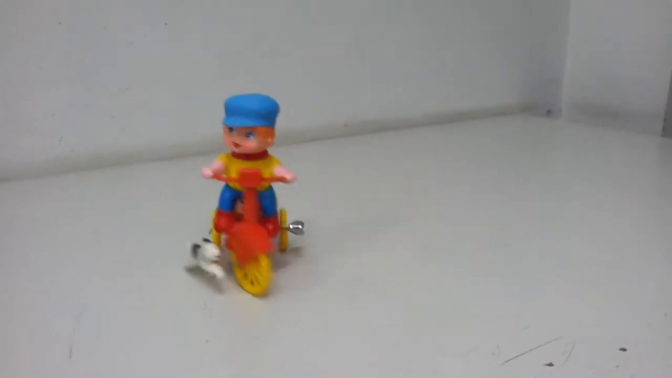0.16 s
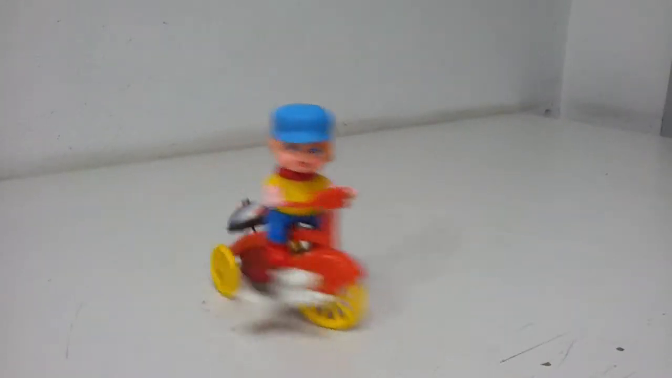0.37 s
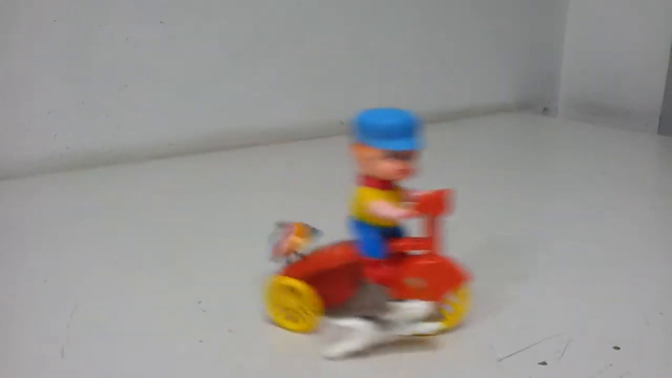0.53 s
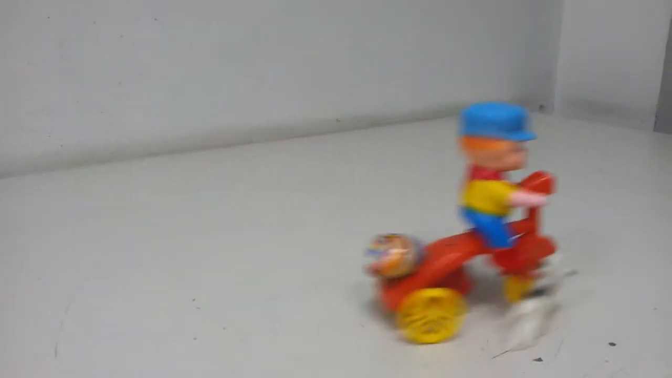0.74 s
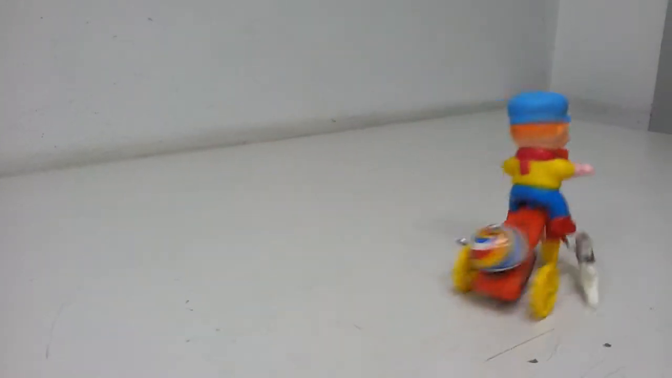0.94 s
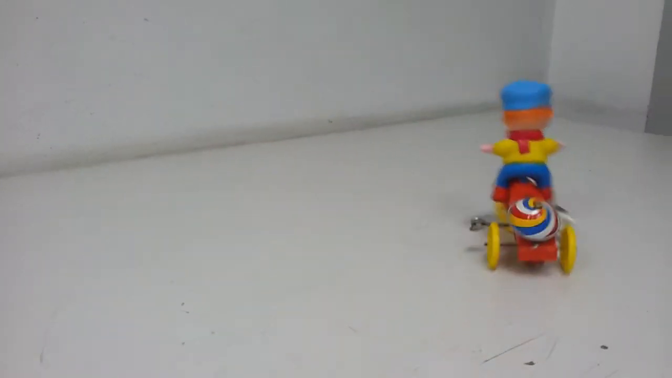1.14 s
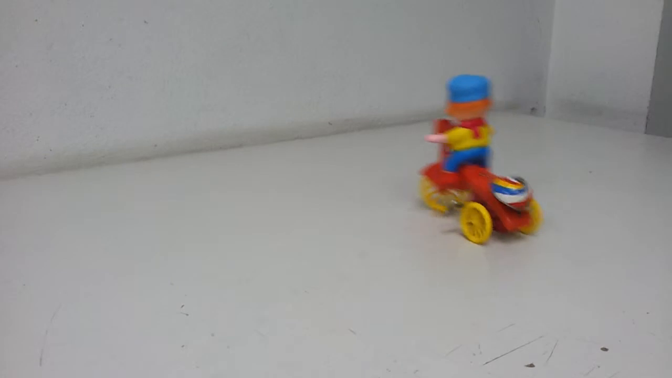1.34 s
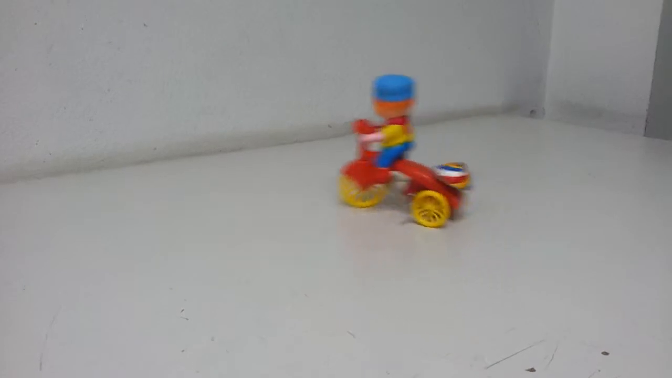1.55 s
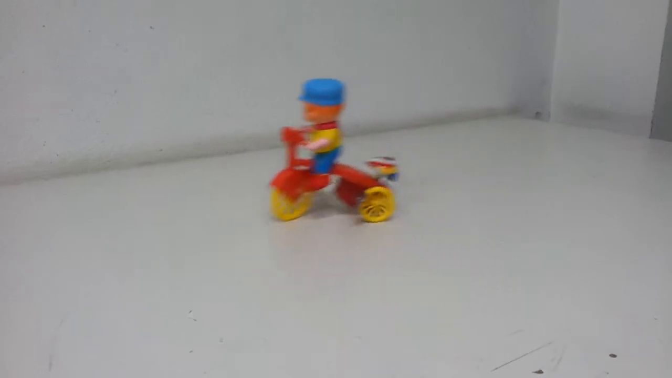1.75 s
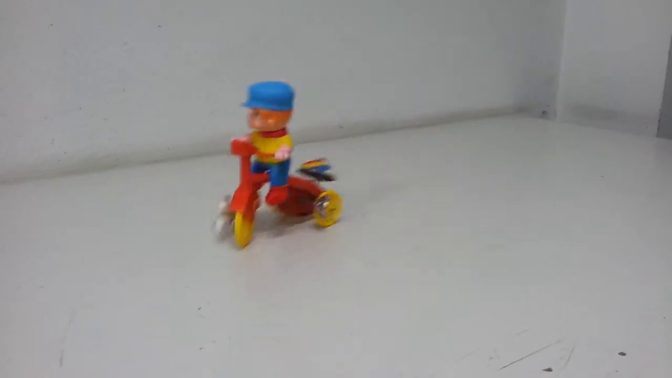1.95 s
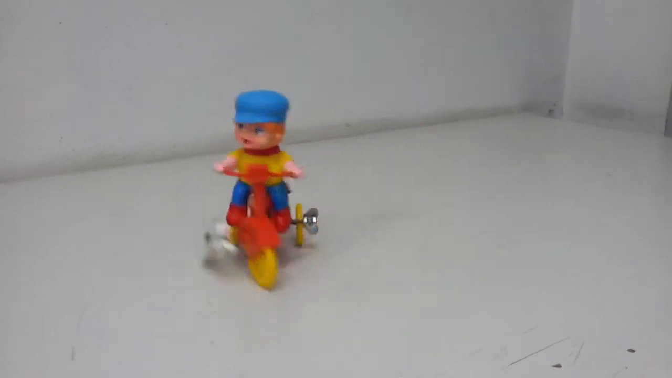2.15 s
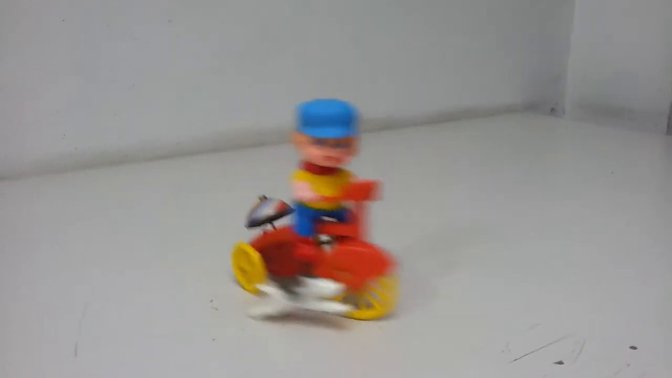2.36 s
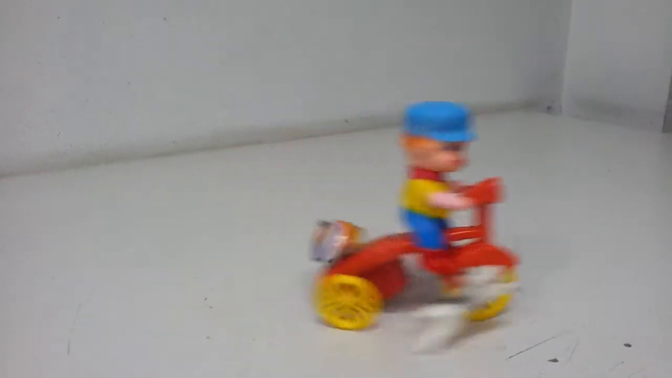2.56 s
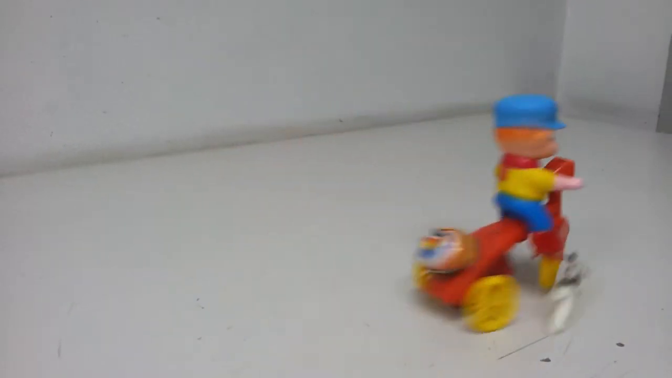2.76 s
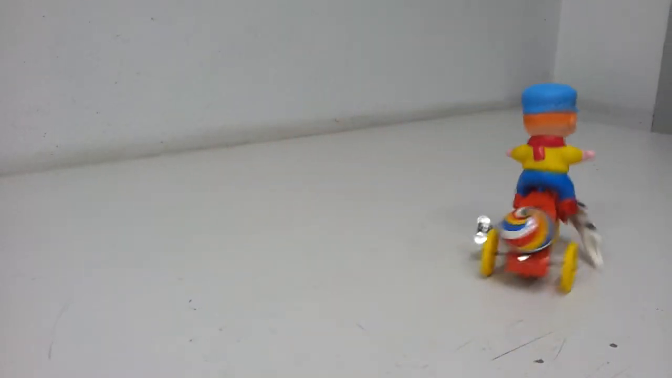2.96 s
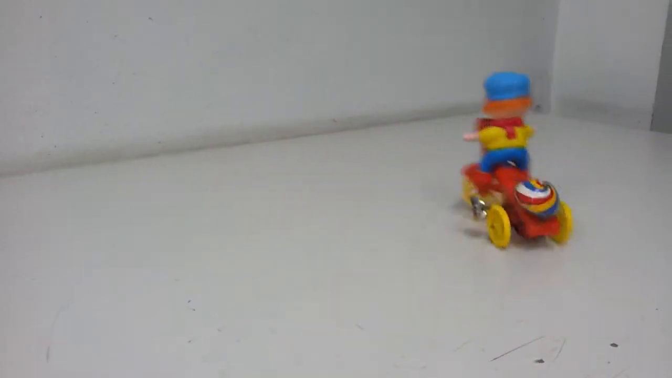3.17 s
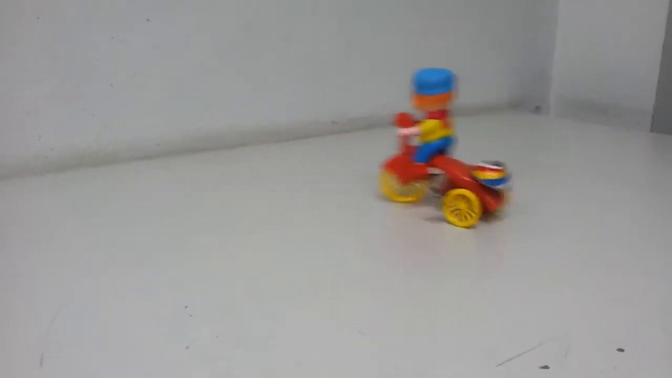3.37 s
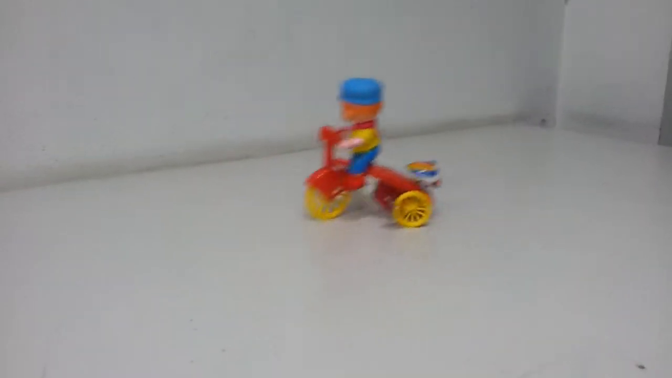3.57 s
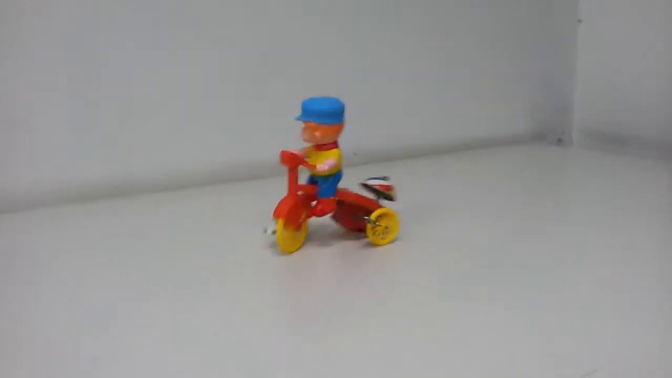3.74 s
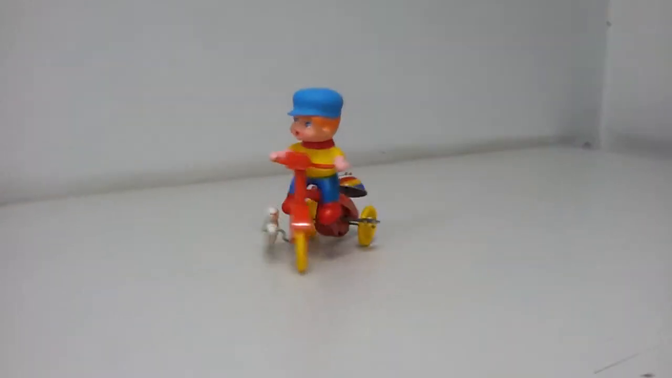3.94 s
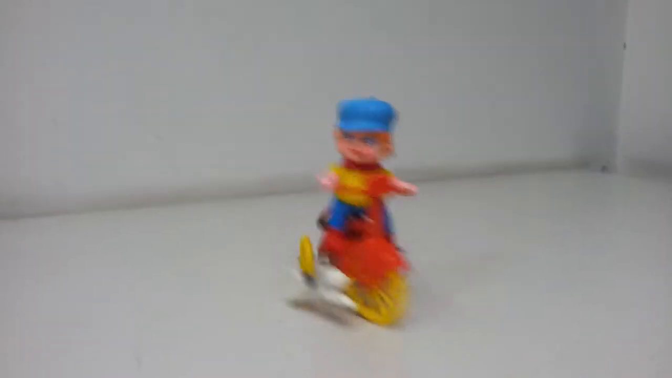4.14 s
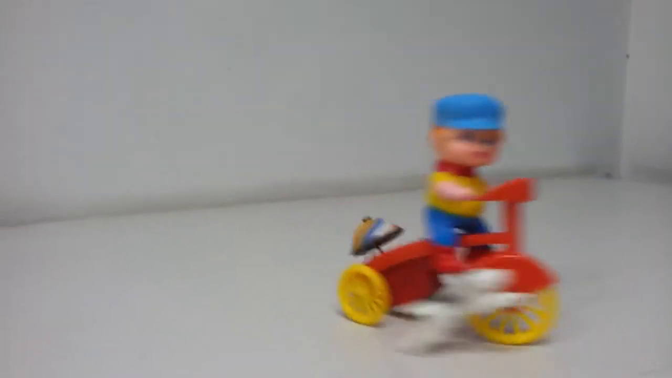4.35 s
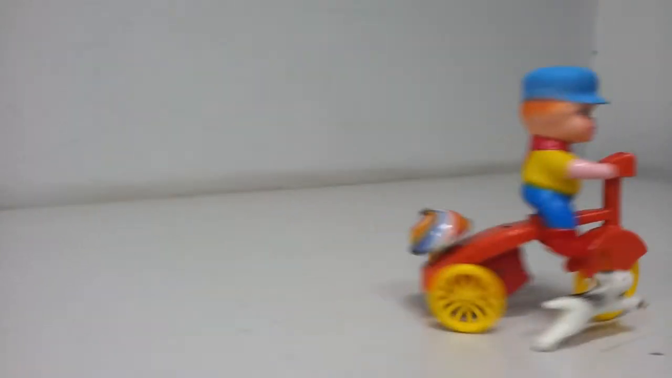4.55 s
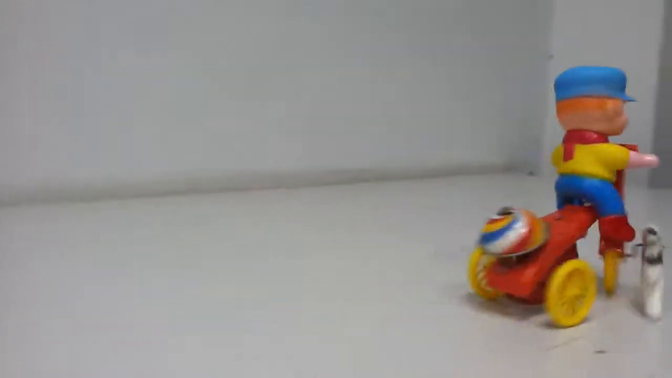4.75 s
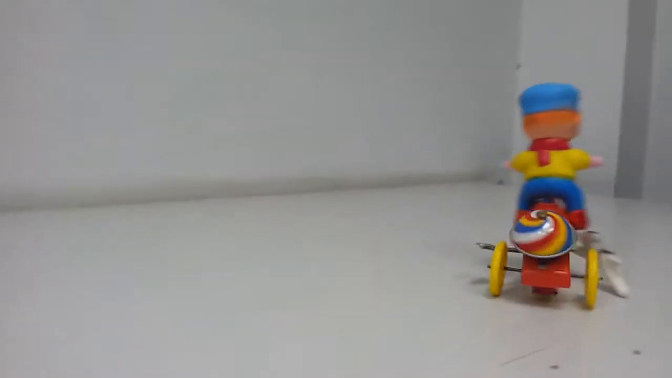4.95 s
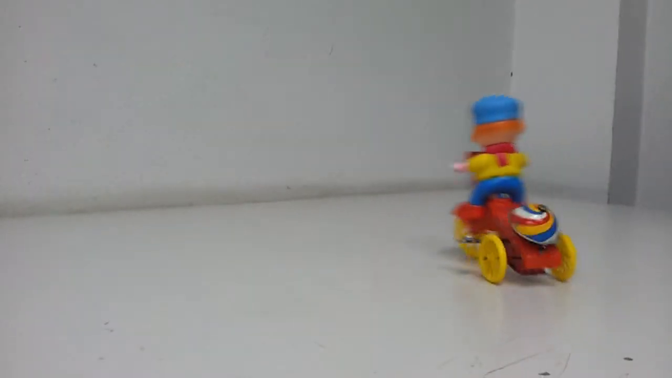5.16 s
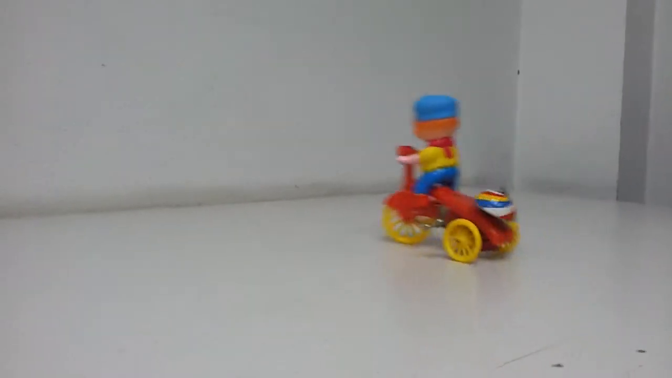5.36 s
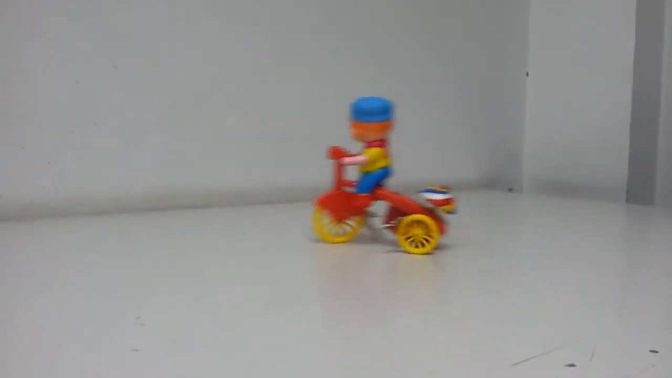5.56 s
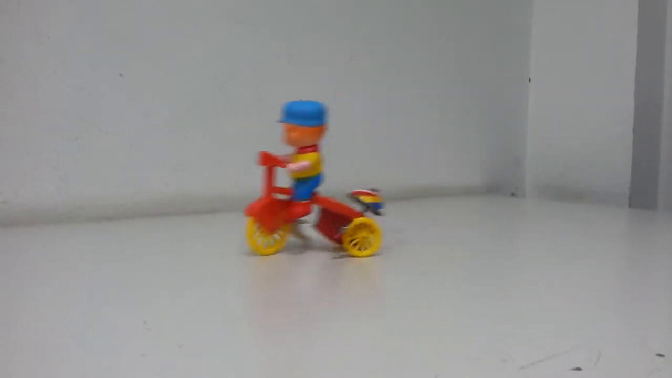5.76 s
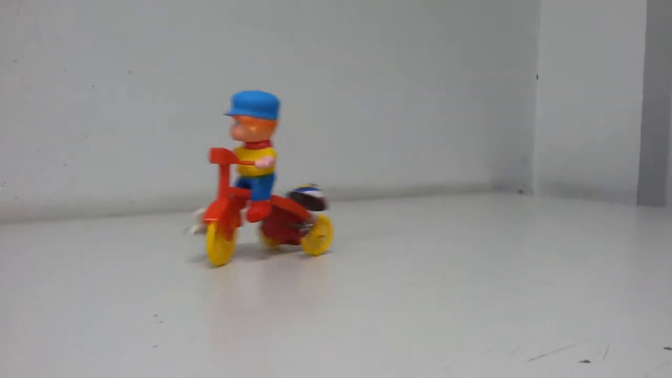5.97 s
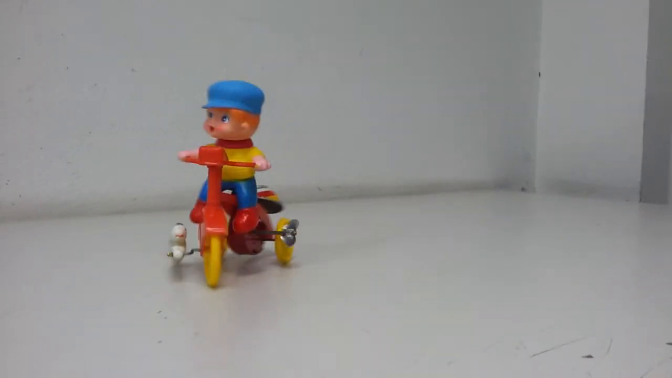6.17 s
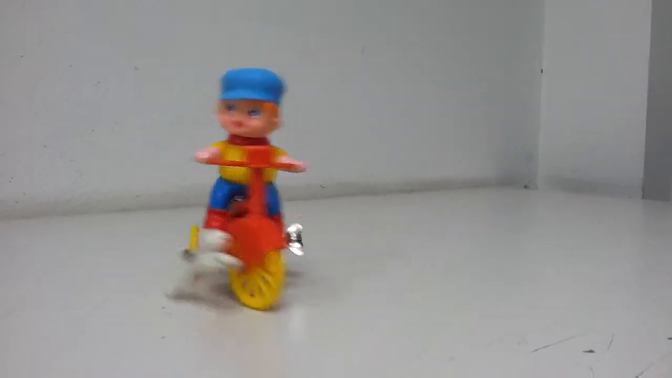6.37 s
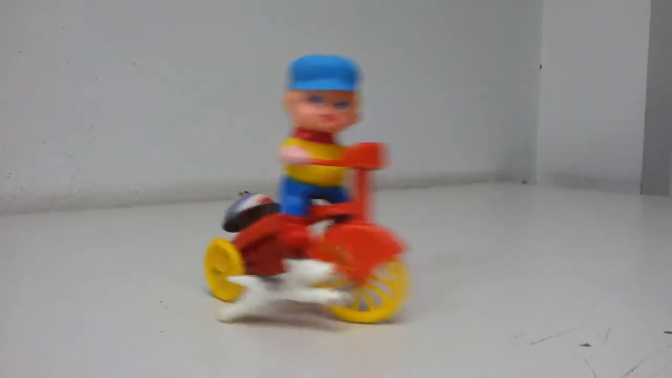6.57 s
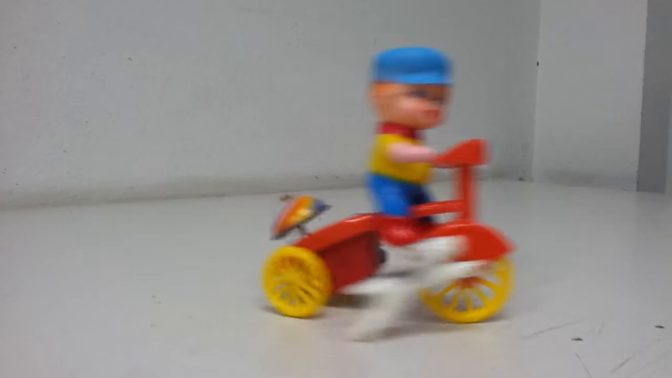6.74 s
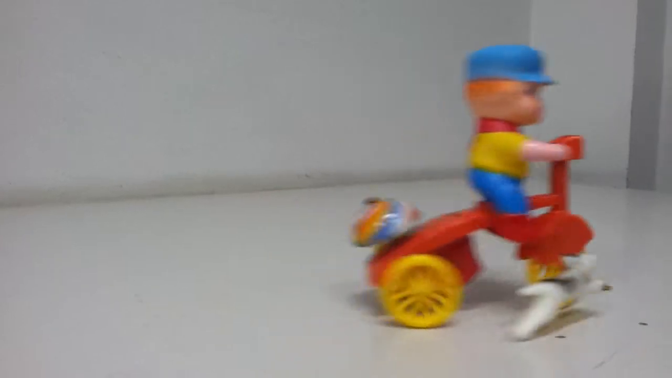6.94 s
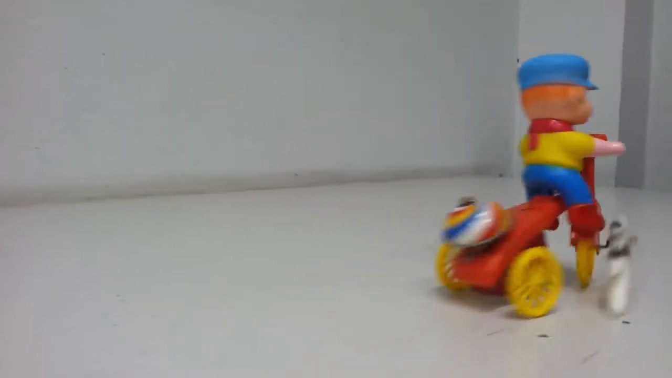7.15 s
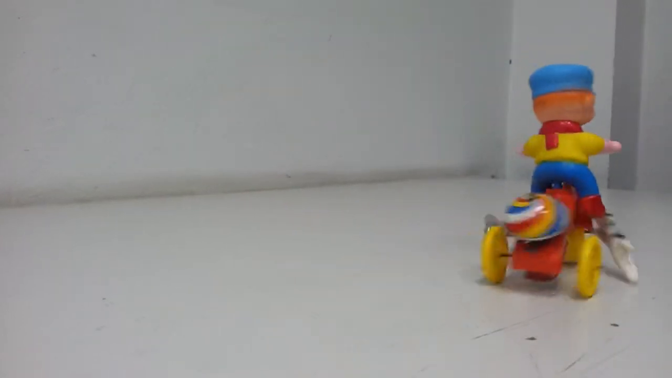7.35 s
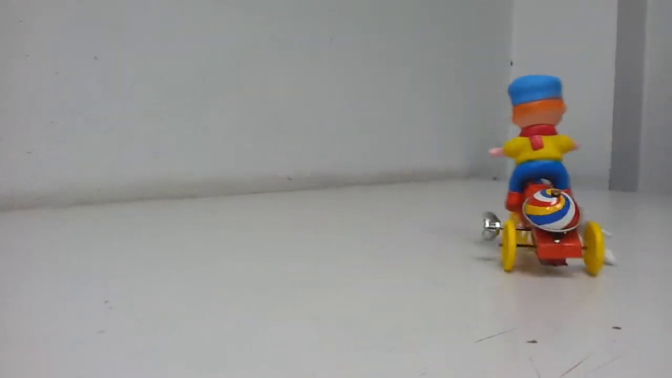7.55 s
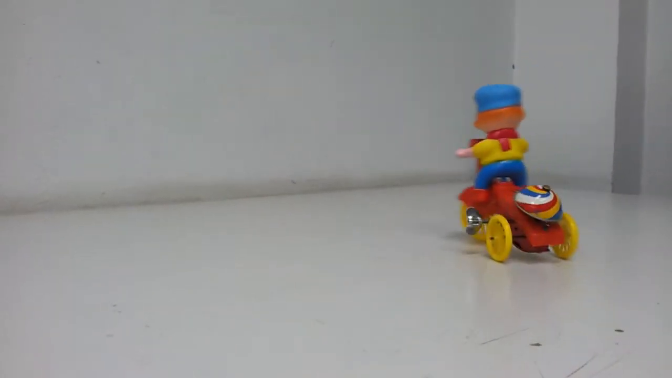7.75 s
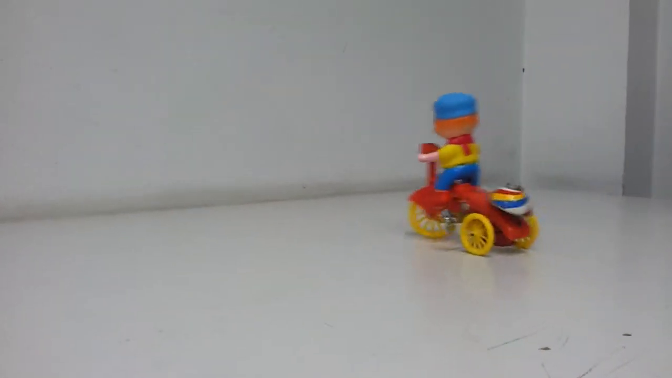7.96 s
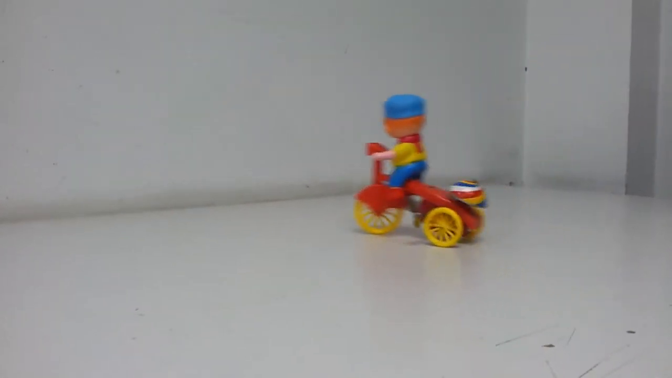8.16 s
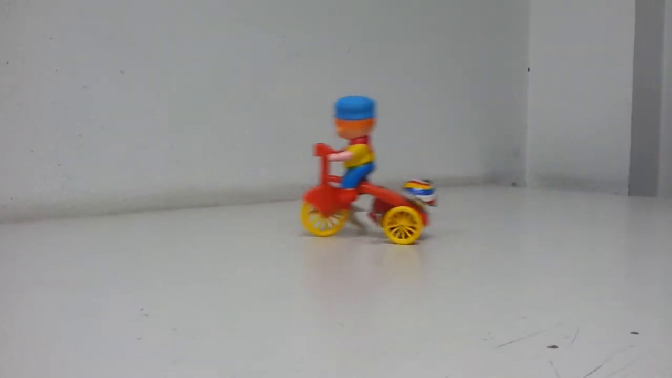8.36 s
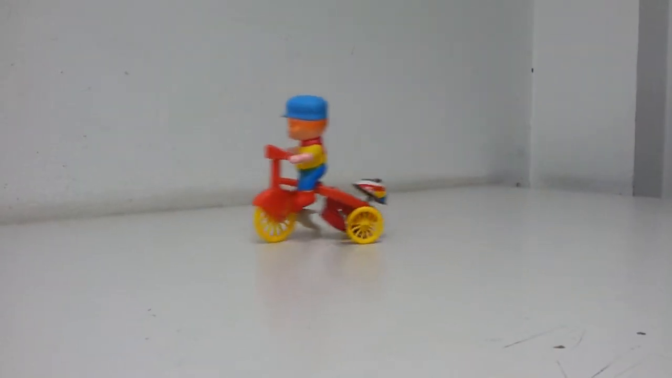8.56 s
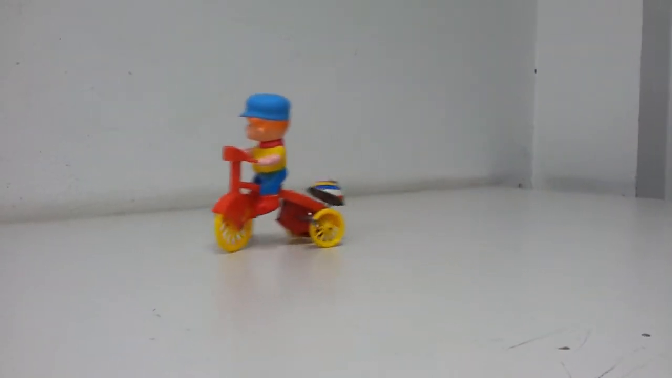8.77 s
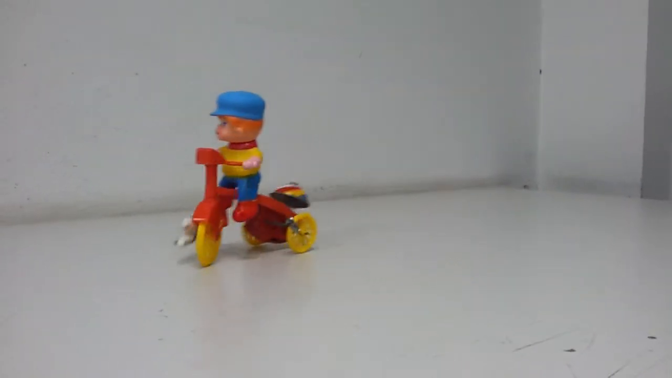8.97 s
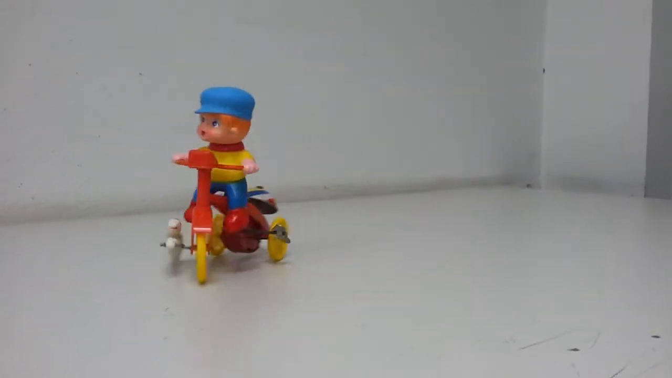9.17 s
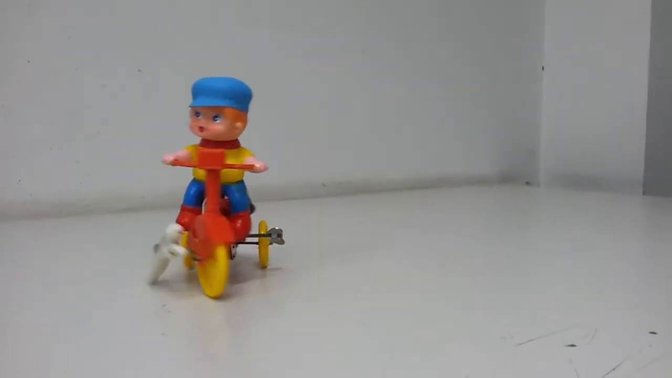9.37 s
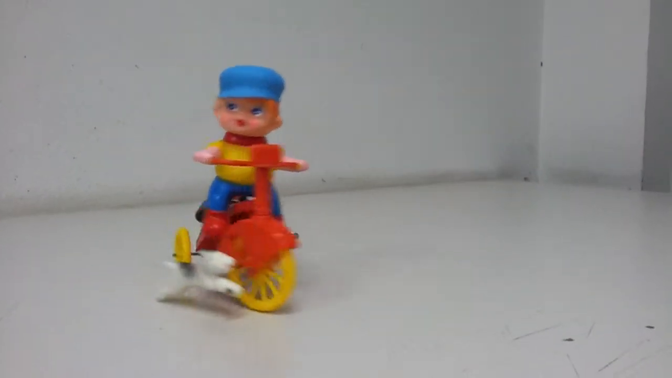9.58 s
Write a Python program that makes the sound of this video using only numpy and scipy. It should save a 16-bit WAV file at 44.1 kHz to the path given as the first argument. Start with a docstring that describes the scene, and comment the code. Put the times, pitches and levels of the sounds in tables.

```python
"""Fast tinny ticking, slowing from about 35 to 20 ticks a second, with bursts of a tiny bell over it.
A clockwork tin tricycle circles on a tabletop in the corner of a small room as its spring runs down.
The escapement shakes the loose tin body (noise bursts in bands); the gears whirr between ticks.
A cam lets the clapper rattle on the bell (split sine pairs). Wheels drone (resonant noise), a few short
low noise bursts break in, and a machine hums (sines) over low room rumble (shaped noise)."""
import sys
import numpy as np
from scipy import signal
from scipy.fft import rfft, irfft
from scipy.io import wavfile
from scipy.ndimage import uniform_filter1d, minimum_filter1d, map_coordinates

SR = 44100
rng = np.random.default_rng(int(sys.argv[2]) if len(sys.argv) > 2 else 0)


def wav_out(sig):
    """Save sig, one row per channel (or a flat mono array), as 16-bit PCM at SR to the path in sys.argv[1]."""
    wavfile.write(sys.argv[1], SR, np.round(np.clip(np.atleast_2d(sig).T, -1, 1) * 32767).astype(np.int16))


N = 423795
TIME = np.arange(N) / SR

# escapement pace as the spring runs down: (time [s], pace [ticks/s])
PACE_CURVE = [(0.0, 31.48), (0.46, 31.24), (0.64, 33.4), (1.18, 32.05), (1.57, 34.74), (2.39, 35.51),
              (2.8, 33.35), (2.94, 35.51), (3.6, 34.75), (4.52, 32.6), (4.63, 31.49), (5.62, 30.55),
              (5.98, 28.69), (6.37, 26.79), (7.07, 25.93), (7.18, 24.41), (7.54, 24.07), (7.65, 23.02),
              (8.21, 22.38), (8.5, 23.16), (8.7, 21.41), (9.61, 20.37)]
USUAL_TICKS_PER_S = 30
# gears out of true: (period [ticks], swing [ticks], tick at which the delay sets in [ticks])
GEAR_RUNOUT = [(9.0, .058, 7.7), (6.385, .035, .73), (11.25, .025, 7.45), (4.51, .013, .56)]


def tick_times(ticks, ticks_per_s):
    """Times [s] at which the escapement reaches these tick counts, late and early by turns from uneven gears."""
    late_ticks = sum(swing * np.sin(2 * np.pi * (ticks - start) / period)
                     for period, swing, start in GEAR_RUNOUT)
    return np.interp(ticks + late_ticks, np.cumsum(ticks_per_s) / SR, TIME, left=-1, right=-1)


# touches within one tick: (place [cycles], scatter [cycles], low ring [dB], middle ring [dB], treble [dB])
TICK_CONTACTS = [(0, .004, 0, 0, 0), (.06, .015, -2, 0, -3), (.15, .025, -3, -2.5, -1),
                 (.235, .025, -7, -5.5, -2.5), (.535, .03, -5.5, -3, -3), (.7, .04, -7, -7, -10)]


def escapement(ticks_per_s, uneven_db, loose_db):
    """Times and low, middle, treble strengths of all contacts; rebounds weaken as the spring runs down."""
    tick = np.arange(int(ticks_per_s.sum() / SR) + 1)[:, None]
    place, scatter, *rings_db = np.transpose(TICK_CONTACTS)
    late, strong = rng.standard_normal((2, len(tick), len(TICK_CONTACTS)))
    times = tick_times(tick + place + scatter * late, ticks_per_s)
    drive_octaves = np.log2(np.interp(times, TIME, ticks_per_s) / ticks_per_s.mean())
    is_rebound = place > 0
    force_db = (uneven_db * strong + loose_db * drive_octaves) * is_rebound
    return times.ravel(), np.array([from_db(db + force_db).ravel() for db in rings_db])


# hard ticks and clacks, each with its own relative strength:
# (time [s], low ring [dB], middle ring [dB], treble [dB])
HARD_TICKS = [(0.0986, -5, -20, -9), (0.1268, -12, -15, -10), (0.14, -4, -16, -21.0),
              (0.219, -11, -8.5, -14), (0.6642, -6, -7, -6), (0.7825, -13, -3, -24),
              (0.9067, -15.0, -13.0, -11.0), (0.9332, -1.5, -20.0, -5), (0.9622, -11.0, -5, -8),
              (1.4564, -6, -15.0, -24.0), (1.5386, -5, -11, -23.0), (1.6317, -21.0, -7, -26),
              (2.0327, -7, -2.5, -11.0), (2.2297, -8, -24, -17.0), (2.255, -7, -11, -8),
              (2.7742, -15.0, -3, -3), (2.801, -6, -9.0, -7), (2.8276, -6, -16, -5),
              (3.2913, -14, -10, -16), (3.3197, -14.0, -7.5, -11), (3.405, -16, -7.5, -24),
              (3.5701, -2, -3.5, -17.0), (3.6005, -10, -11, -18), (4.073, -10, -3, -10), (4.1, -20, -5, -9),
              (4.2836, -12, -4, -16.0), (4.648, -4, -18.0, -13), (4.711, -23, -19, -6),
              (4.814, -23, -19, -3), (4.9076, -8, -12.0, -7), (4.9356, -4.5, -7, -3),
              (5.2585, -13, -15.0, -23.0), (5.2918, -21, -9, -12), (5.3225, -19, -5, -20),
              (5.3582, -14, -11, -19), (5.456, -7, -5, -19), (5.4862, -4, -18.0, -14),
              (5.516, -10, -3, -20), (5.6171, -9, -5.5, -17), (5.7175, -7, -23, -26),
              (6.0273, -5, -21.0, -22.0), (6.0642, -15, -11.0, -12), (6.096, -18, -14, -17),
              (6.1269, -17, -13, -18.0), (6.161, -24, -11, -13), (6.1997, -14, -17.0, -21),
              (6.2385, -15.0, -22, -9), (6.2774, -17.0, -9.0, -17), (6.3148, -11.0, -23, -26),
              (6.35, -23.0, -9, -25.0), (6.3876, -23.0, -9.0, -14.0), (6.4228, -19, -6, -18.0),
              (6.4599, -7, -9, -25.0), (6.4952, -25, -14, -24), (6.6465, -21.0, -9, -16.0),
              (6.7662, -15.0, -10, -17.0), (6.8764, -5, -18, -12), (6.9175, -8.0, -22, -10),
              (6.9563, -2, -19, -8), (6.9952, -7, -22.0, -21.0), (7.0323, -13.0, -11, -11.0),
              (7.0703, -14.0, -19, -21.0), (7.1077, -17, -17, -9), (7.1442, -7, -6, -1),
              (7.1822, -22, -12, -5), (7.2298, -16, -22.0, -5), (7.271, -10, -23.0, -4),
              (7.3143, -10, -21.0, -5), (7.3548, -20.0, -24.0, -22.0), (7.3945, -11.0, -28, -7),
              (7.4385, -9, -21, -11), (7.6877, -18, -26, -17), (7.7801, -16, -16, -23.0),
              (7.8273, -13.0, -9, -18.0), (7.8692, -20.0, -12, -27), (7.909, -18, -12, -26),
              (7.9481, -7, -24.0, -28.0), (7.9927, -14.0, -11, -25), (8.0374, -17.0, -12, -23),
              (8.0846, -10, -11, -13), (8.132, -8, -23.0, -16.0), (8.1763, -9, -10, -31),
              (8.2195, -16.0, -9, -16.0), (8.2623, -19.0, -6, -22), (8.3053, -26, -12.0, -13),
              (8.3504, -14.0, -19, -16.0), (8.3944, -19, -5, -17), (8.44, -18, -8, -21.0),
              (8.5827, -25.0, -18.0, -11.0), (8.7955, -14, -12.0, -29), (8.8473, -27.0, -22, -10),
              (8.8986, -21.0, -23, -15.0), (8.9476, -21, -16.0, -17.0), (8.9944, -11, -8.5, -22),
              (9.0407, -16.0, -9, -11), (9.0832, -17, -8, -18), (9.1261, -12, -10, -14),
              (9.1728, -18.0, -16, -24), (9.222, -25, -18, -9), (9.271, -11.0, -10, -12),
              (9.321, -26.0, -10, -13), (9.3723, -20.0, -22, -17.0), (9.4234, -21, -23.0, -24),
              (9.4725, -12, -11, -21.0), (9.5298, -27, -12.0, -24), (9.5748, -26.0, -19, -14)]
# landing crack of the pallet: rise when the pace halves, scatter between ticks
SLACK_DB, TICK_SCATTER_DB = 2, 1.5


def jolts(ticks, pace_octaves, hard_tick_db, tick_db, clapper_db):
    """Power of blows per ring: hard ticks and clacks, plain pallet landings, clapper jarring the body."""
    hard_s, *rings_db = np.transpose(HARD_TICKS)
    stroke_s, stroke_db, _ = np.transpose(CLAPPER_STROKES)
    slack_db = -SLACK_DB * np.interp(ticks, TIME, pace_octaves)
    landing_db = slack_db + TICK_SCATTER_DB * rng.standard_normal(len(ticks))
    # ticks without a strength of their own
    plain = np.abs(ticks[:, None] - hard_s).min(axis=1) > .005
    powers = []
    for ring_db, trim_db, tick, jar in zip(rings_db, hard_tick_db, tick_db, clapper_db):
        hard = impulses(hard_s, from_db(ring_db + trim_db) ** 2)
        landings = impulses(ticks, plain * from_db(landing_db + tick) ** 2)
        jars = impulses(stroke_s, from_db(stroke_db + jar) ** 2)
        powers.append(hard + landings + jars)
    return np.array(powers)


def in_step(times, ticks):
    """Move ticks within 5 ms of a hard tick or bell stroke on to it; the times between follow."""
    ticks = ticks[ticks >= 0]
    shift_s = np.zeros(len(ticks))
    for s, *_ in [*HARD_TICKS, *CLAPPER_STROKES]:
        shift_s = np.where(np.abs(s - ticks) < .005, s - ticks, shift_s)
    return times + np.interp(times, ticks, shift_s)


# beaming round the circle, relative levels: (share of lap [0-1], low ring [dB], middle ring [dB], treble [dB])
LAP_BEAM = [(0.0, -22, -21, -20), (0.1, -22, -22, -22.5), (0.2, -19.5, -21, -19), (0.3, -17, -20.5, -18.5),
            (0.4, -17.5, -18.5, -19.5), (0.5, -20, -21, -20), (0.6, -20, -20.5, -21),
            (0.7, -22, -20, -22.5), (0.8, -21, -19, -22.5), (0.9, -20.5, -22, -19)]
# circle wanders nearer and farther: (time [s], low and middle ring [dB], treble [dB])
NEARNESS_CURVE = [(0, -0.6, -3.5), (.8, -2, -4), (2.4, -0.3, -2), (2.95, -3, -5.5), (4.1, 0.5, -2),
                  (4.7, -1.5, -2), (5.4, 0, -1.5), (5.8, -0.5, -3.5), (6.45, -0.2, -4), (7.25, -1.5, -3.5),
                  (7.6, -2, -1), (7.9, -2, -4.5), (9.6, -0.5, -6)]
# gain when the pace doubles: (low [dB], middle [dB], treble [dB])
PACE_GAIN_DB = [8.5, 7, 4.5]
TICKS_PER_LAP = 67.4
# left microphone hears the toy later, most at this share of the lap
LAG_MS, LAG_SWING_MS, RIGHTMOST_SHARE = 0.109, 0.153, 0.4005


def circling(ticks_per_s, pace_octaves):
    """Ring levels [dB] and left-microphone lag [ms] as the toy's direction and distance change."""
    laps = np.cumsum(ticks_per_s) / SR / TICKS_PER_LAP
    share, *rings = np.transpose(LAP_BEAM)
    near_db, treble_db = in_time(NEARNESS_CURVE)
    ring_db = [np.interp(laps, share, db, period=1) + gain_db * pace_octaves
               for db, gain_db in zip(rings, PACE_GAIN_DB)]
    lag_ms = LAG_MS + LAG_SWING_MS * np.cos(2 * np.pi * (laps - RIGHTMOST_SHARE))
    return np.array(ring_db) + [near_db, near_db, treble_db], lag_ms


def chatter(power, grain_db, shared):
    """Sprays of tiny metal impacts as noise: one part for both microphones, one for each alone."""
    # drift at this rate flickers for the first 2.7 s, then holds
    grains = np.sqrt(power) * rms_one(from_db(grain_db * drift(1500)))
    shared = np.clip(shared, 0, 1)
    return grains * np.sqrt([[shared], [1 - shared], [1 - shared]]) * rng.standard_normal((3, N))


# body regions struck differently by every contact: (edge [Hz])
BODY_EDGES_HZ = [300, 2200, 3000, 3900, 4900, 6500, 8600, 10300, 11600, 13000, 17000]
# bottom region of the clatter, relative: (time [s], level [dB])
HOLLOW_LEVEL = [(0, -23), (.55, -25.5), (.7, -22), (1.3, -23.5), (2.25, -23), (2.6, -23.5), (3.45, -20.5),
                (3.7, -24), (5.0, -23), (5.25, -25), (5.6, -24.5), (6.6, -25.5), (7.4, -25), (7.8, -27),
                (9.1, -27.5), (9.6, -32.5)]
HOLLOW_HARD_DB = -9  # gain of the hard blows in the bottom region
# clatter colour at the bright left microphone: (frequency [Hz], relative density [dB/Hz])
LEFT_MIC_COLOUR = [(150, -3.5), (600, -17.5), (1000, -9), (1300, 0), (1700, 2), (2100, -1.5), (4200, 1),
                   (5700, -5.5), (7000, 4), (9500, 8), (10800, 17.5), (11700, 15.5), (12700, 9.5),
                   (14400, -1.5)]
# clatter colour at the dull right microphone: (frequency [Hz], relative density [dB/Hz])
RIGHT_MIC_COLOUR = [(150, -16), (600, -8.5), (1100, -3), (2050, -4.5), (2450, 1.5), (3700, 3), (4300, 8),
                    (5300, 6), (5900, 0.5), (7400, 1), (8700, -4.5), (10200, -10.5), (11200, -5.5),
                    (14400, -17)]


def tin_body(times, sizes, hard, ring_db, lag_ms, crack_t60, hard_t60, tail_t60, tail_db,
             whirr_db, body_db, patchy_db, swell_db):
    """Contacts crack over gear whirr in bands of shell modes; lists are low, middle, treble, t60 in s."""
    paths = np.zeros((3, N))
    for low, high in zip(BODY_EDGES_HZ, BODY_EDGES_HZ[1:]):
        # shares of the low, middle and treble ring in this region
        blend = np.array([np.interp((low + high) / 2, [2700, 4500, 5700, 9000], row)
                          for row in ([1, 0, 0, 0], [0, 1, 1, 0], [0, 0, 0, 1])])
        patchy = from_db(patchy_db * rng.standard_normal(len(times)))
        blows = impulses(times, (blend @ sizes * patchy) ** 2)
        # power decays at t60 / 2; the diffuse tail comes from the table and near walls
        crack = die_away(blows, blend @ crack_t60 / 2)
        tail = from_db(blend @ tail_db) ** 2 * die_away(blows, tail_t60 / 2)
        power = crack + tail
        # the spring feeds energy evenly, however the contacts share it
        power = power / (uniform_filter1d(power, size=9000) + 1e-9)
        power = power + from_db(blend @ whirr_db) ** 2
        # each region swells and fades slowly at random
        level_db = blend @ ring_db + swell_db * np.clip(drift(6.5), -1, 1)
        hard_power = die_away(blend @ hard, blend @ hard_t60 / 2)
        if low == BODY_EDGES_HZ[0]:
            level_db = in_time(HOLLOW_LEVEL)[0]
            hard_power = hard_power * from_db(HOLLOW_HARD_DB) ** 2
        total_power = power * from_db(level_db + body_db) ** 2 + hard_power
        spray = chatter(total_power, grain_db=0.7, shared=0.17)
        band = signal.butter(4, [low, high], "band", fs=SR, output="sos")
        paths += signal.sosfilt(band, spray)
    direct, left, right = paths
    delayed = map_coordinates(direct, [np.arange(N) - lag_ms * SR / 1000], order=3)
    left_mic = colour(delayed + left, LEFT_MIC_COLOUR)
    right_mic = colour(direct + right, RIGHT_MIC_COLOUR)
    return shifting_ring(np.array([left_mic, right_mic]), vary_db=2.5)


# tin resonances: (frequency [Hz], sharpness Q [1], mean boost [dB], extra boost when the pace halves [dB])
TIN_MODES = [(1720, 200, 1, 0), (2420, 170, 4.5, 0), (2830, 180, 2.5, -3), (3350, 320, 4.5, 7),
             (5220, 300, 4.5, 0), (8000, 300, 4, 0), (9030, 170, 3, 0)]


def shifting_ring(x, vary_db):
    """Loose shells keep resettling, so each resonance rings now more, now less."""
    slack_octaves = np.log2(USUAL_TICKS_PER_S / in_time(PACE_CURVE)[0])
    for hz, sharpness, height_db, slack_db in TIN_MODES:
        gain = from_db(height_db + slack_db * slack_octaves + vary_db * drift(USUAL_TICKS_PER_S))
        x = x + (gain - 1) * signal.lfilter(*signal.iirpeak(hz, sharpness, fs=SR), x)
    return x


# reflections from table and two walls: (delay [ms], random swing [ms], level re direct sound [dB])
NEAR_REFLECTIONS = [(0.447, 0.089, -11), (1.601, 0.33, -7), (3.101, 0.425, -6.5)]


def corner(x, wander_per_s, dull_hz=6000):
    """Wandering reflection delays shift peaks and notches in the ring; the treble beams past the walls."""
    dulled = signal.sosfiltfilt(signal.butter(2, dull_hz, fs=SR, output="sos"), x)
    echoes = np.zeros((2, N))
    for delay_ms, swing_ms, level_db in NEAR_REFLECTIONS:
        for channel in (0, 1):
            delay_s = np.abs(delay_ms + swing_ms * drift(wander_per_s)) / 1000
            echo = map_coordinates(dulled[channel], [(TIME - delay_s) * SR], order=3)
            echoes[channel] += from_db(level_db) * echo
    echo_power = np.sum(from_db(np.array(NEAR_REFLECTIONS)[:, 2]) ** 2)
    return x - dulled + (dulled + echoes) / np.sqrt(1 + echo_power)


# upper split mode pair: (frequency [Hz], relative level [dB])
UPPER_PAIR = [(13140, -0.5), (13215, 3)]
# lower split mode pair: (frequency [Hz], relative level [dB])
LOWER_PAIR = [(7138, -3.5), (7178, -13)]
# cam-held bursts, about a stroke a tick, relative: (time [s], upper modes [dB], lower modes [dB])
CLAPPER_STROKES = [(0.352, -8.5, -13), (0.384, -8.5, -4), (0.4138, -15, -24), (0.444, -15, -11),
                   (0.4785, -16, -14), (0.51, -9, -14), (0.541, -10, -11), (1.0594, -10, -18),
                   (1.091, -11, -17), (1.1222, -10, -14), (1.1533, -14, -18), (1.1848, -12, -13),
                   (1.211, -9, -11.5), (1.2478, -13, -19), (1.2748, -12, -21), (1.6904, -13, -28),
                   (1.7156, -4, -10.5), (1.742, -5, -10), (1.7717, -9, -7.5), (1.799, -7, -15),
                   (1.8299, -12, -27), (1.86, -10, -26), (1.887, -15, -15), (1.915, -9, -15),
                   (2.3709, -10, -13), (2.3989, -9, -9), (2.4232, -10, -9), (2.4534, -12, -7),
                   (2.4811, -8, -7), (2.5106, -11, -11), (2.5396, -8, -7.5), (3.007, -12, -10),
                   (3.0339, 0, -1), (3.0607, -8, -7), (3.0866, -6, -24), (3.114, -16, -15),
                   (3.146, -15, -15.5), (3.174, -10, -14), (3.201, -13, -23), (3.2317, -16, -14),
                   (3.662, -7, -19), (3.6928, -9, -14), (3.722, -8, -15), (3.7519, -12, -22),
                   (3.7795, -8, -11), (3.806, -10, -11), (3.8342, -13, -16), (3.8629, -8, -12),
                   (3.891, -20, -27), (4.3116, -7, -6.5), (4.343, -4, -21), (4.3714, -14, -31),
                   (4.404, -15, -8.5), (4.4321, -1.5, -12), (4.4644, -14, -25), (4.493, -7, -13),
                   (4.523, -8.5, -15), (4.5576, -7, -13), (5.0357, -6, -6.5), (5.07, -12, -30),
                   (5.0974, -10, -13), (5.1273, -14, -20), (5.1602, -10, -28), (5.1935, -9, -15),
                   (5.225, -8, -7), (5.256, -26, -27), (5.7836, -8, -18), (5.8166, -7, -16),
                   (5.85, -11, -14.5), (5.8845, -13, -24), (5.9188, -10, -15), (5.951, -15, -13),
                   (5.9903, -8, -13.5), (6.537, -9, -15), (6.5739, -9, -13), (6.6107, -8, -12),
                   (6.6472, -12, -14), (6.6863, -11, -13), (6.727, -9, -27), (6.7655, -9, -8.5),
                   (6.8, -11, -6), (6.8373, -10, -13), (6.8778, -22, -29), (7.439, -10, -10),
                   (7.477, -5.5, -11), (7.5171, -9, -15), (7.5584, -11, -12.5), (7.6009, -11, -10.5),
                   (7.6433, -13, -15), (7.6868, -12, -13), (7.7326, -16, -13.5), (8.351, -16, -22),
                   (8.396, -18, -20), (8.4406, -17, -20), (8.4813, -13, -14), (8.525, -8.5, -5),
                   (8.5708, -10, -15), (8.618, -9, -16), (8.6597, -13, -16), (8.704, -17, -17),
                   (8.7484, -18, -13.5), (9.4723, -12, -22), (9.5217, -8.5, -7.5), (9.564, -18, -15)]
REBOUND_DB = -16  # re stroke


def bell(times, sizes, t60s, sides_db, detune_hz, tail_db, path_spread, graze_db):
    """Strokes ring two split mode pairs; the escapement jolts the clapper back on, breaking up the ring."""
    s, *peaks_db = np.transpose(CLAPPER_STROKES)
    before = np.clip(np.searchsorted(s, times) - 1, 0, None)
    since_s = times - s[before]
    rebounds = (since_s > .004) & (since_s < .03)
    stroke = np.clip(np.searchsorted(s, TIME + 1 / SR) - 1, 0, None)
    grazing = np.searchsorted(np.sort(times[rebounds]), TIME)
    out = np.zeros((2, N))
    for k, modes in enumerate((UPPER_PAIR, LOWER_PAIR)):
        again = from_db(peaks_db[k][before] + REBOUND_DB) * rebounds * np.tanh(sizes)
        blows = impulses(s, from_db(peaks_db[k]) ** 2) + impulses(times, again ** 2)
        tail = from_db(tail_db) ** 2 * die_away(blows, 0.88 / 2)
        swell = np.sqrt(die_away(blows, t60s[k] / 2) + tail)
        side_db = np.array(sides_db[k])[:, None]
        for hz, mode_db in modes:
            # each stroke: new clapper load on the shell, start phase, path to each microphone
            load, start, *paths = rng.standard_normal((len(s), 4))[stroke].T
            turn = 2 * np.pi * (hz + detune_hz[k] * load) * (TIME - s[stroke])
            phase = turn + start + path_spread * np.array(paths)
            # each graze feeds or chokes the mode
            grip_db = graze_db * rng.standard_normal(len(times))[grazing]
            out += from_db(mode_db + side_db + grip_db) * swell * np.sin(phase)
    return out


# hollow resonances excited by the wheels: (frequency [Hz], width [Hz])
HOLLOW_DRONES = [(750, 90), (437, 50)]
# rolling drones, relative: (time [s], upper level [dB], lower level [dB])
ROLLING_LEVEL = [(0, -60, -47), (.24, -53, -51), (.36, -41.5, -44), (.8, -47.5, -67), (1.27, -43.5, -50),
                 (1.399, -51, -51.5), (2.1, -50, -41), (2.35, -43.5, -60), (2.7, -42, -52),
                 (2.95, -51.5, -52), (4.25, -48, -48), (4.5, -41, -49.5), (5.5, -53, -52),
                 (6.25, -48.5, -47), (6.9, -46, -55), (8.3, -59, -50.5), (9.6, -51, -51)]


def wheels(drone_db, lumpy_db, scatter):
    """Rolling noise sets toy and tabletop droning in two hollow resonances."""
    out = np.zeros((2, N))
    for (hz, width_hz), level_db, trim_db in zip(HOLLOW_DRONES, in_time(ROLLING_LEVEL), drone_db):
        hollow = signal.iirpeak(hz, hz / width_hz, fs=SR)
        once = signal.lfilter(*hollow, rng.standard_normal((3, N)))
        common, *apart = rms_one(signal.lfilter(*hollow, once))
        gain = from_db(level_db + trim_db + lumpy_db * drift(60))
        out += gain * (common + scatter * np.array(apart))
    return out


# short low bursts: (time [s], level before noise and filter [dB])
LOW_BURSTS = [(3.17, -19), (5.036, -18), (5.066, -19), (5.224, -19.5), (7.642, -23), (7.951, -25)]


def low_bursts(t60, dull_hz):
    """Short low noise bursts: decaying noise, band-limited."""
    s, level_db = np.transpose(LOW_BURSTS)
    bursts = die_away(impulses(s, from_db(level_db)), t60) * rng.standard_normal(N)
    return signal.sosfilt(signal.butter(2, [180, dull_hz], "band", fs=SR, output="sos"), bursts)


# room rumble: (frequency [Hz], relative density [dB/Hz])
ROOM_RUMBLE = [(20, -7.5), (46, 3.5), (75, -3), (98, 1), (150, -3), (200, 0.5), (260, -3), (400, -12.5),
               (700, -15.5), (2000, -22.5)]
# machine hum: (frequency [Hz], rms level before the side gains [dB])
MACHINE_HUM = [(64.3, -43), (127, -62), (192, -53.5)]


def background(rumble_db, apart_db, waver, side_db):
    """Low shaped-noise rumble and unsteady sine hum, stronger on the left; waver is a phase swing [rad]."""
    common, left, right = (rms_one(colour(noise, ROOM_RUMBLE)) for noise in rng.standard_normal((3, N)))
    hum = sum(from_db(db) * np.sqrt(2) * np.sin(2 * np.pi * hz * TIME + waver * drift(1.31))
              for hz, db in MACHINE_HUM)
    together = (from_db(rumble_db) * common + hum) * from_db(side_db)[:, None]
    return together + from_db(rumble_db + apart_db) * np.array([left, right])


def from_db(db):
    """Decibels to gain."""
    return 10 ** (np.asarray(db) / 20)


def rms_one(x):
    """Scale to unit power."""
    return x / np.sqrt(np.mean(x ** 2) + 1e-20)


def in_time(rows):
    """Columns of a curve at every sample."""
    s, *columns = np.transpose(rows)
    return [np.interp(TIME, s, c) for c in columns]


def drift(per_s):
    """Random straight-line wander, per_s new values a second, held after 4096 values."""
    return np.interp(TIME * per_s, np.arange(4096), rng.standard_normal(4096))


def impulses(times, sizes):
    """Train of single-sample blows."""
    inside = (times >= 0) & (times < TIME[-1])
    return np.bincount((times[inside] * SR).astype(int), sizes[inside], N)


def die_away(x, t60):
    """Exponential tail after each blow, down 60 dB in amplitude after t60 [s]."""
    return signal.lfilter([1], [1, -from_db(-60 / (t60 * SR))], x + 1e-18)


def colour(x, spectrum, size=8192):
    """Causal minimum-phase filter from a smooth spectrum, by folding its cepstrum."""
    hz = np.maximum(np.fft.rfftfreq(size, 1 / SR), 1)
    points = np.array(spectrum)
    db = np.interp(np.log(hz), np.log(points[:, 0]), points[:, 1])
    cepstrum = irfft(np.log(from_db(db)))
    cepstrum[1:size // 2] *= 2
    cepstrum[size // 2 + 1:] = 0
    return signal.oaconvolve(x, irfft(np.exp(rfft(cepstrum))))[:N]


def scene():
    """The toy in its room: body with reflections, bell, rolling, low bursts and background."""
    ticks_per_s, = in_time(PACE_CURVE)
    pace_octaves = np.log2(ticks_per_s / USUAL_TICKS_PER_S)
    ticks = tick_times(np.arange(int(ticks_per_s.sum() / SR) + 1), ticks_per_s)
    times, sizes = escapement(ticks_per_s, uneven_db=1.6, loose_db=6.0)
    times, ticks = in_step(times, ticks), in_step(ticks, ticks)
    hard = jolts(ticks, pace_octaves, hard_tick_db=[-1, -.5, -.5], tick_db=[-21, -21, -26],
                 clapper_db=[-14, -14, -12])
    ring_db, lag_ms = circling(ticks_per_s, pace_octaves)
    body = tin_body(times, sizes, hard, ring_db, lag_ms,
                    crack_t60=[.022, .018, .015], hard_t60=[.036, .028, .022],
                    tail_t60=0.84, tail_db=[-14, -16, -21], whirr_db=[-10, -12, -16],
                    body_db=3.0, patchy_db=4.5, swell_db=0.8)
    ting = bell(times, sizes[-1], t60s=[.085, .18], sides_db=[[4.8, -12.0], [0.28, -0.5]],
                detune_hz=[25, 7], tail_db=-23.5, path_spread=1.0, graze_db=2.0)
    rolling = wheels(drone_db=[-2, -4], lumpy_db=5.5, scatter=0.89)
    bursts = low_bursts(t60=0.052, dull_hz=1003)
    room = background(rumble_db=-40.0, apart_db=-2.5, waver=0.91, side_db=[4.0, -5.0])
    return corner(body, wander_per_s=3.0) + ting + rolling + bursts + room


CUTOFF_HZ = 14600


def record(dry, ceiling=1.66, top=0.97):
    """A fast limiter holds the loudest strikes, which still clip and crackle; the top is cut."""
    needed = np.minimum(1, ceiling / (np.abs(dry) + 1e-9))
    gain = uniform_filter1d(minimum_filter1d(needed, size=30), size=30)
    clipped = np.clip(dry * gain, -top, top)
    return signal.sosfiltfilt(signal.ellip(8, .05, 45, CUTOFF_HZ, fs=SR, output="sos"), clipped)


dry = scene()
out = record(dry)
wav_out(out)
```